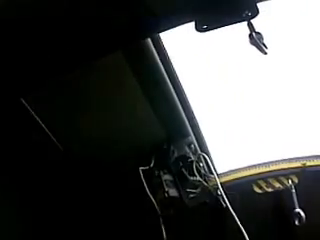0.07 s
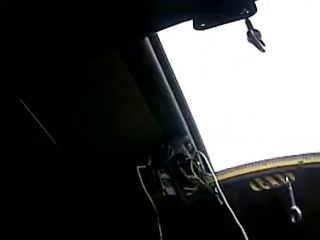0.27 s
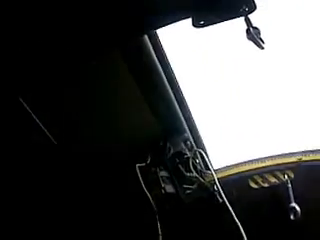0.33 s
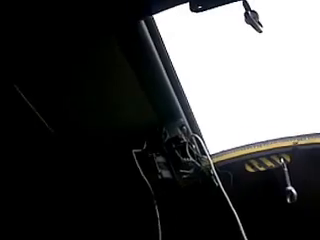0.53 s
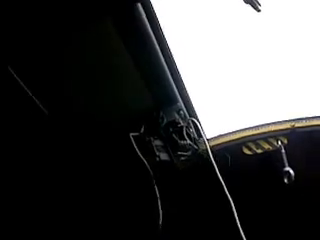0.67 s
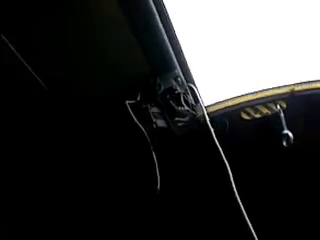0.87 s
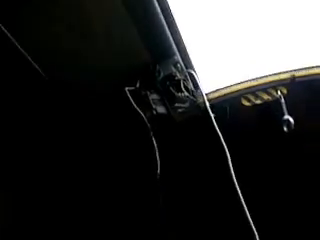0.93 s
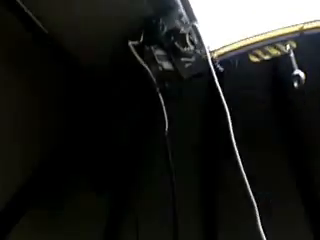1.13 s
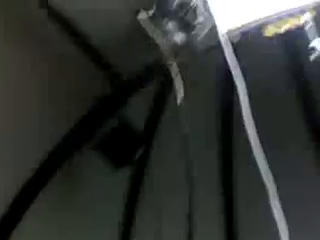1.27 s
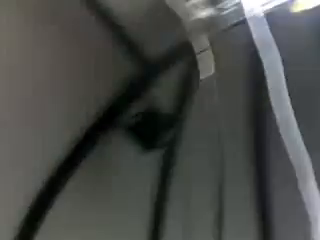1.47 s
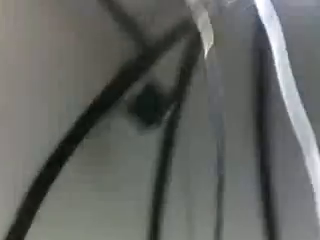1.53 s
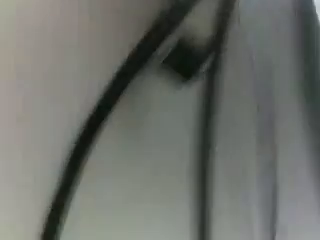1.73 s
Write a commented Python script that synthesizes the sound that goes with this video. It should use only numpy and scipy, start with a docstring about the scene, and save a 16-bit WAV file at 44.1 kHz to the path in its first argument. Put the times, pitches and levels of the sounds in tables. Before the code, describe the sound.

A heavy clunk rings through a hollow dome as a rolling shutter reaches the end of its track. Heard from inside, a small echoing click follows, and the shell settles with faint groans, two soft low booms and hiss.

```python
"""A shutter rolls along its track in a hollow dome, wheels rumbling. At 0.33 s it hits its end stop:
a heavy thud, a short crash of loose panels, and the shell rings on. At 0.68 s a latch clicks and
echoes off the curved wall. Parts rub and the settling shell groans over a low rumble. From 1.3 s the
dome sways with two low booms, a sliding part whines faintly and the background hiss swells."""
import sys
import numpy as np
from scipy import signal
from scipy.fft import rfft, irfft
from scipy.io import wavfile

SR = 44100
rng = np.random.default_rng(int(sys.argv[2]) if len(sys.argv) > 2 else 0)


def unload_audio(sound):
    """Save the sound as a 16-bit wav file, at the path given as the first command line argument."""
    columns = np.transpose(np.atleast_2d(sound))
    # keep every value between -1 and 1, then stretch to whole-number steps
    steps = np.round(np.clip(columns, -1, 1) * 32767)
    wavfile.write(sys.argv[1], SR, steps.astype(np.int16))


N = 79380

# end-stop blows, then a faint late knock (time [s], level [dB], contact time [s], thud treble [dB])
BLOWS = [(.332, -26.5, 0.0042, 3), (.3403, -12.5, 0.0012, -7), (0.3485, -15, .0011, 0),
         (.3844, -17.5, 0.0014, 9), (0.4407, -30.5, 0.0019, 10.5), (1.288, -38.5, .002, -2)]
# shell modes (frequency [Hz], relative level [dB], t60 [s])
SHELL_MODES = [(45.9, -2.5, 0.76), (89.1, -10.5, .75), (103.5, 3.4, 0.26), (125.8, -6, 0.69),
               (177.1, 2, 0.78), (226, -1, 0.38), (256.2, -6.5, 0.65), (284.7, -15, 0.61),
               (333.3, -1, 0.59), (383, -3, 0.43), (429.5, -10, 0.8), (473, -11.5, 0.85), (603.4, -2, 0.82)]
# body of a blow (frequency [Hz], relative density [dB])
THUD_SPECTRUM = [(25, -9), (45, -14), (62, -32), (100, -15.5), (200, -7), (350, -10.5), (550, -20.5),
                 (1000, -34.5), (3000, -76)]
THUD_GAIN_DB, THUD_ATTACK_S, THUD_T60_S, THUD_WET_DB = -2.5, 0.005, 0.091, -10.5

# panel chatter (frequency [Hz], relative density [dB])
CRASH_SPECTRUM = [(150, 3), (250, -4), (400, -8.5), (839, -15), (1300, -17.5), (1600, -24.5), (2270, -27.5),
                  (5000, -31), (7010, -35), (8600, -36.5), (10000, -49), (12000, -80)]
# panel resonances (frequency [Hz], width [Hz], relative level [dB])
PANEL_RESONANCES = [(226, 25, -13.5), (380, 13, -23), (605, 26, -21), (812.6, 11, -19.5), (849, 12, -25),
                    (999, 28, -23), (1150, 26, -27), (1240, 43, -28.5), (1365, 30, -25.5), (3390, 50, -29),
                    (4850, 29, -32.5), (7000, 600, -24.5)]
CRASH_DB, CRASH_START_S, CRASH_ATTACK_S, CRASH_HOLD_S, CRASH_T60_S = -16, 0.3187, 0.064, 0.026, 0.3
TREBLE_LAG_S, CRASH_WET_DB, RATTLES_PER_S = 0.062, -10, 14000

# wheels on the track (frequency [Hz], relative density [dB])
ROLL_SPECTRUM = [(15, -25), (25, 2.5), (54, -20.5), (85, -6), (149, -12), (175, -11), (253, -9.5),
                 (443, -12), (1100, -22.5), (1550, -29.5), (6190, -42.5), (7450, -34.5), (14500, -48)]
# shell drone under the wheels (frequency [Hz], width [Hz], level [dB])
DRONE_RESONANCES = [(35.8, 46, -37), (88, 11.5, -33), (172.8, 6, -40.5), (306, 48, -42), (477, 13, -43.5)]
ROLL_DB, ROLL_ROUGH_DB, ROLL_HOLD_S, ROLL_T60_S = -31, 1, 0.372, 0.098

# latch contacts (time [s], relative level [dB])
LATCH_CONTACTS = [(0.6823, -22), (.6832, -17), (0.6848, -20), (.6860, -24), (.7020, -18.5), (.7045, -25)]
# filter on the direct click (frequency [Hz], gain [dB])
CLICK_FILTER = [(300, -13), (900, 9), (1400, 8), (2200, 8.5), (3200, -6), (4500, 0.5), (7000, -7),
                (14000, -5)]
# filter on the latch's slide, echo and reverb (frequency [Hz], gain [dB])
LATCH_TAIL_FILTER = [(300, 5.5), (900, -6), (1400, 2), (2200, -3.5), (3200, -0.5), (4500, -4), (7000, -8.5),
                     (10000, -17), (14000, -12)]
# latch modes (frequency [Hz], level [dB], t60 [s])
LATCH_MODES = [(1430, -41, 0.054), (2170, -47, 0.037)]
SLIDE_S, SLIDE_DB, ECHO_DELAY_S, ECHO_DB, LATCH_WET_DB = 0.012, -53, 0.021, -15, -9.5

# shell sways (start [s], hold [s], frequency [Hz], level [dB])
SWAYS = [(1.287, 0.12, 34.2, -33.5), (1.556, 0.1, 37.8, -35.5)]
SWAY_ATTACK_S, SWAY_T60_S = 0.015, 0.29
# shell groans (start [s], attack [s], hold [s], frequency [Hz], level [dB])
GROANS = [(0.738, 0.055, 0.024, 166, -36.5), (0.882, 0.013, 0.0087, 172.2, -36),
          (0.951, 0.026, 0.065, 158, -46.5), (1.042, 0.036, 0.033, 226, -46),
          (1.163, 0.04, .06, 159, -48.5), (1.617, 0.019, 0.15, 160, -53)]
GROAN_T60_S, GROAN_WANDER_HZ, GROAN_ROUGH_DB = 0.35, 3.9, 3
# rubbing parts (start [s], attack [s], hold [s], frequency [Hz], width [Hz], level [dB])
RUBS = [(0.276, 0.0024, 0.029, 11400, 3320, -53.5), (0.574, 0.025, 0.055, 84, 22, -33.5),
        (0.655, 0.064, 0.085, 480, 560, -45.5), (1.474, 0.014, 0.027, 4530, 3110, -60.5),
        (1.614, 0.03, 0.011, 1440, 406, -61.5)]
RUB_T60_S = 0.18
WHINE_START_S, WHINE_ATTACK_S, WHINE_HOLD_S = 1.255, 0.23, 0.058
WHINE_HZ, WHINE_WIDTH_HZ, WHINE_DB = 2090, 150, -64

# dome reverb decay (frequency [Hz], t60 [s])
DOME_DECAY = [(40, 0.25), (90, 0.64), (170, 1.12), (350, 1.35), (800, 0.65), (2000, 0.52), (5000, 0.39),
              (12000, 0.16)]
# dome rumble (frequency [Hz], width [Hz], relative level [dB])
RUMBLE_RESONANCES = [(85, 20, 0), (166, 69, -0.5), (133.3, 9.1, -2.5), (238.6, 30, -8)]
# rumble swell (time [s], gain [dB])
RUMBLE_GAIN = [(0, -60), (.55, -52), (.8, -43.5), (1.05, -47.5), (1.25, -52.5), (1.4, -51.5), (1.52, -54.5),
               (1.8, -59.5)]
# swelling background hiss (frequency [Hz], relative density [dB])
SWELLING_HISS_SPECTRUM = [(200, -1.5), (330, 8), (450, -1), (640, 1), (970, -3), (2000, -5.5), (2500, -8.5),
                          (5000, -10), (8000, -15), (14000, -10.5)]
# late rise of that hiss (time [s], level [dB])
SWELLING_HISS_LEVEL = [(0, -79), (1.1, -64.5), (1.21, -55), (1.33, -56.5), (1.45, -54.5), (1.56, -52.5),
                       (1.64, -51), (1.7, -54.5), (1.8, -56)]
# steady hiss (frequency [Hz], relative density [dB])
HISS_SPECTRUM = [(300, 2), (2000, -10), (5000, -12.5), (8000, -12), (11000, -4.5), (14000, -2.5)]
HISS_DB = -63
LOW_CUT_HZ, HIGH_CUT_HZ, CEILING = 14.6, 14500, 0.97


def undb(db):
    """Decibels to gain."""
    return 10 ** (np.asarray(db) / 20)


def unit(x):
    """Scale to rms 1."""
    return x / np.sqrt(np.mean(x ** 2) + 1e-20)


def seconds():
    """Time of every sample."""
    return np.arange(N) / SR


def on_log_axis(hz, points):
    """Interpolate (frequency [Hz], value) points over log frequency."""
    points_hz, values = np.array(points, float).T
    return np.interp(np.log(hz + 1e-3), np.log(points_hz), values)


def colour(x, points):
    """Filter by (frequency [Hz], gain [dB]) points; 12 dB/octave roll-off below the first."""
    hz = np.arange(N + 1) * SR / (2 * N)
    skirt = np.minimum(hz / points[0][0], 1) ** 2
    return irfft(rfft(x, 2 * N) * undb(on_log_axis(hz, points)) * skirt)[:N]


def noise(points):
    """Coloured noise, rms 1."""
    return unit(colour(rng.standard_normal(N), points))


def octaves(x):
    """Overlapping octave bands (centre [Hz], signal)."""
    centres_hz = 30 * 2. ** np.arange(10)
    log_hz = np.log(np.arange(N // 2 + 1) * SR / N + 1e-3)
    spectrum = rfft(x)
    return [(hz, irfft(spectrum * np.interp(log_hz, np.log(centres_hz), weights), N))
            for hz, weights in zip(centres_hz, np.eye(len(centres_hz)))]


def resonances(table):
    """Sum of noise-driven resonances (frequency [Hz], width [Hz], level [dB])."""
    hz = np.arange(N // 2 + 1) * SR / N
    out = 0
    for centre_hz, width_hz, db in table:
        phasors = np.exp(2j * np.pi * rng.random(len(hz)))
        spectrum = phasors / (1 + (2 * (hz - centre_hz) / width_hz) ** 2)
        out += undb(db) * unit(irfft(spectrum, N))
    return out


def envelope(start_s, attack_s, hold_s, t60_s):
    """Linear attack, hold, exponential release."""
    t = seconds() - start_s
    release = np.exp(-np.log(1000) * np.maximum(t - attack_s - hold_s, 0) / t60_s)
    return np.clip(t / attack_s, 0, 1) * release


def sine(hz, start_s=0):
    """Sine with zero phase at start_s."""
    return np.sin(2 * np.pi * hz * (seconds() - start_s))


def convolve(x, response):
    """Apply an impulse response."""
    return signal.fftconvolve(x, response)[:N]


def shell_blows():
    """Soft heavy blows ring the shell's modes and thud into the dome."""
    t = seconds()
    ring = sum(undb(db) * sine(hz) * np.exp(-np.log(1000) * t / t60_s) for hz, db, t60_s in SHELL_MODES)
    force, thud = 0, 0
    for time_s, db, contact_s, treble_db in BLOWS:
        push = np.exp(-2 * ((t - time_s) / contact_s) ** 2)
        force += undb(db) * push / push.sum()
        body = colour(noise(THUD_SPECTRUM), [(20, 0), (250, 0), (700, treble_db)])
        thud += undb(db + THUD_GAIN_DB) * body * envelope(time_s, THUD_ATTACK_S, 0, THUD_T60_S)
    return convolve(force, ring) + thud + undb(THUD_WET_DB) * dome_reverb(thud)


def panel_crash():
    """Jolted panels chatter and ring; higher bands swell later and faster."""
    contacts = rng.standard_normal(N) * (rng.random(N) < RATTLES_PER_S / SR)
    chatter = unit(colour(contacts, CRASH_SPECTRUM))
    crash = 0
    for hz, band in octaves(chatter + resonances(PANEL_RESONANCES)):
        lag_s = TREBLE_LAG_S * min(hz / 7000, 1)
        attack_s = max(CRASH_ATTACK_S - lag_s, 0.003)
        crash += band * envelope(CRASH_START_S + lag_s, attack_s, CRASH_HOLD_S, CRASH_T60_S)
    return undb(CRASH_DB) * (crash + undb(CRASH_WET_DB) * dome_reverb(crash))


def rolling():
    """Wheels rumble and hiss unevenly on the track; the shell drones until the stop."""
    roughness = undb(ROLL_ROUGH_DB * resonances([(38.0, 13, 0.0035)]))
    wheels = undb(ROLL_DB) * noise(ROLL_SPECTRUM) * roughness
    return (wheels + resonances(DRONE_RESONANCES)) * envelope(0, 0.0011, ROLL_HOLD_S, ROLL_T60_S)


def latch():
    """The bolt slides, contacts ring the latch, the curved wall returns a blurred echo."""
    def impulse(time_s):
        return 1. * (np.arange(N) == int(time_s * SR))

    def burst(time_s, t60_s):
        scatter = unit(rng.standard_normal(N) * envelope(0, 0.00013, 0, t60_s)) / np.sqrt(N)
        return convolve(impulse(time_s), scatter)

    first_s = LATCH_CONTACTS[0][0]
    clicks = sum(undb(db) * burst(time_s, t60_s=0.0024) for time_s, db in LATCH_CONTACTS)
    slide = noise(LATCH_TAIL_FILTER) * envelope(first_s - SLIDE_S, 0.00088, SLIDE_S, 0.01)
    ring = sum(undb(db) * sine(hz, first_s) * envelope(first_s, 0.001, 0.002, t60_s)
               for hz, db, t60_s in LATCH_MODES)
    echo = undb(ECHO_DB) * burst(first_s + ECHO_DELAY_S, t60_s=0.19)
    reverb = undb(LATCH_WET_DB) * dome_reverb(impulse(first_s))
    tail = colour(echo + reverb, LATCH_TAIL_FILTER)
    return undb(SLIDE_DB) * slide + colour(clicks, CLICK_FILTER) + ring + tail


def sway():
    """The whole shell heaves in two low booms."""
    return sum(undb(db) * sine(hz, start_s) * envelope(start_s, SWAY_ATTACK_S, hold_s, SWAY_T60_S)
               for start_s, hold_s, hz, db in SWAYS)


def groans():
    """The settling shell hums in short rough swells of unsteady pitch."""
    flutter = lambda: resonances([(20, 30, 0)])
    out = 0
    for start_s, attack_s, hold_s, hz, db in GROANS:
        pitch_hz = hz + GROAN_WANDER_HZ * flutter()
        roughness = undb(GROAN_ROUGH_DB * flutter())
        tone = unit(np.sin(2 * np.pi * np.cumsum(pitch_hz) / SR) * roughness)
        out += undb(db) * tone * envelope(start_s, attack_s, hold_s, GROAN_T60_S)
    return out


def rubs():
    """Sliding parts hiss before the stop, grumble as they settle, then scrape faintly."""
    return sum(resonances([(hz, width_hz, db)]) * envelope(start_s, attack_s, hold_s, RUB_T60_S)
               for start_s, attack_s, hold_s, hz, width_hz, db in RUBS)


def whine():
    """A sliding part sings faintly in one narrow band."""
    band = resonances([(WHINE_HZ, WHINE_WIDTH_HZ, WHINE_DB)])
    return band * envelope(WHINE_START_S, WHINE_ATTACK_S, WHINE_HOLD_S, RUB_T60_S)


def dome_reverb(x):
    """Diffuse tail: builds over the echo delay, lasts longest in the low mids."""
    tail = sum(band * envelope(0, ECHO_DELAY_S, 0, on_log_axis(hz, DOME_DECAY))
               for hz, band in octaves(rng.standard_normal(N)))
    return convolve(x, unit(tail) / np.sqrt(N))


def background():
    """Low rumble, steady hiss, and hiss that swells late, as when automatic gain rises after a thud."""
    gain = lambda curve: undb(np.interp(seconds(), *np.array(curve).T))
    rumble = resonances(RUMBLE_RESONANCES) * gain(RUMBLE_GAIN)
    swelling_hiss = noise(SWELLING_HISS_SPECTRUM) * gain(SWELLING_HISS_LEVEL)
    return rumble + swelling_hiss + undb(HISS_DB) * noise(HISS_SPECTRUM)


def scene():
    """Mono mix, heard from inside the dome."""
    shutter = rolling() + shell_blows() + panel_crash() + latch()
    return (shutter + sway() + groans() + whine() + rubs() + background())[None]


def record(dry):
    """Low cut, soft peak rounding, high cut."""
    low_cut = signal.butter(2, LOW_CUT_HZ, "high", fs=SR, output="sos")
    high_cut = signal.ellip(8, 0.2, 70, HIGH_CUT_HZ, fs=SR, output="sos")
    trimmed = signal.sosfilt(low_cut, dry)
    rounded = trimmed / (1 + (trimmed / CEILING) ** 4) ** 0.25
    return signal.sosfilt(high_cut, rounded)


dry = scene()
out = record(dry)
unload_audio(out)
```